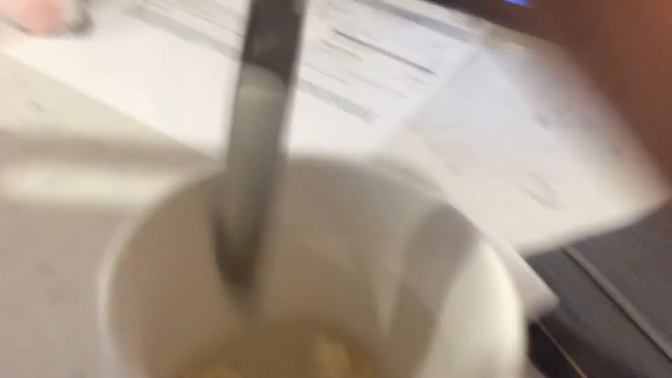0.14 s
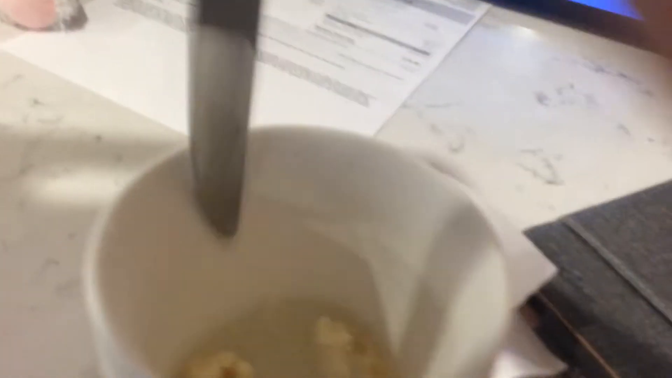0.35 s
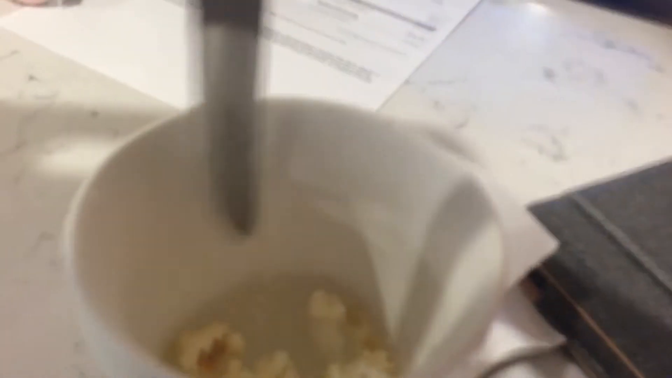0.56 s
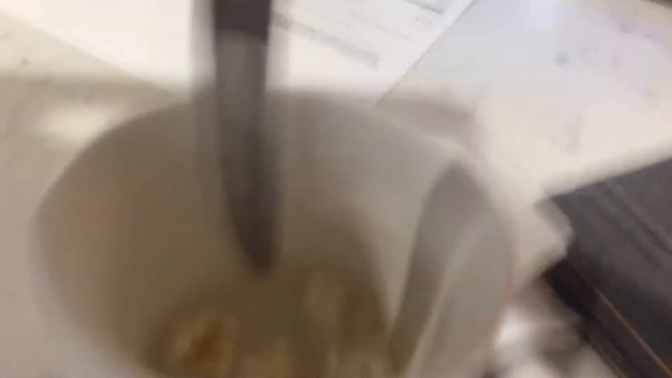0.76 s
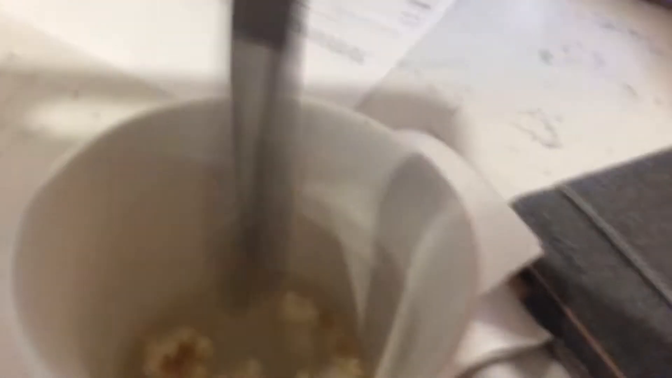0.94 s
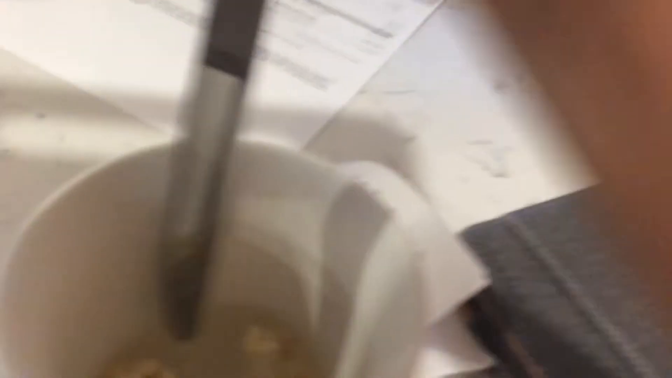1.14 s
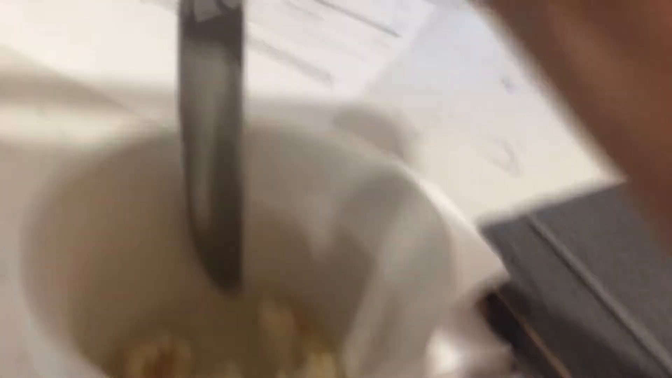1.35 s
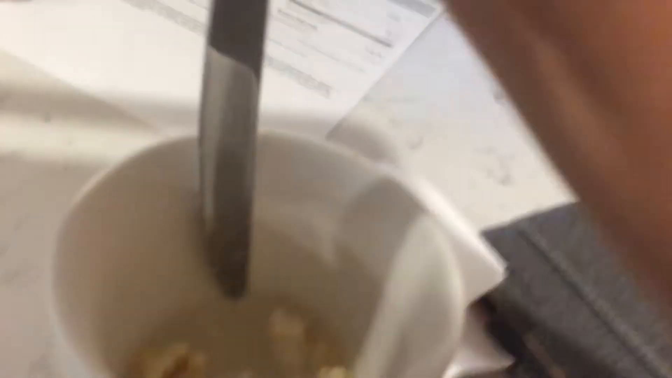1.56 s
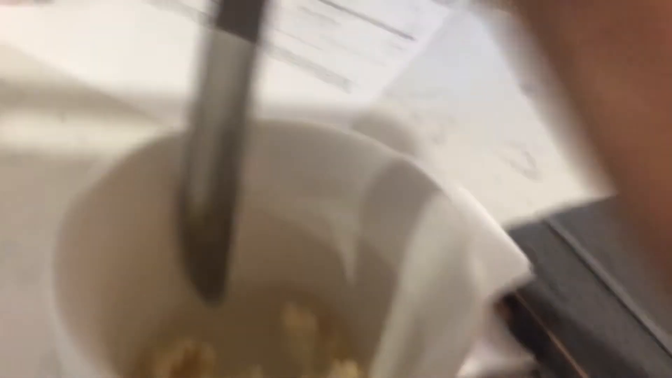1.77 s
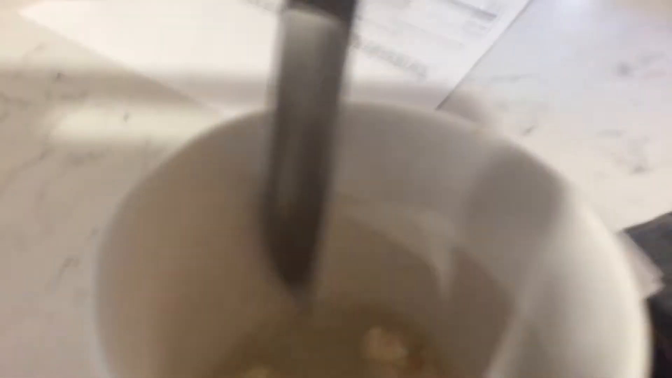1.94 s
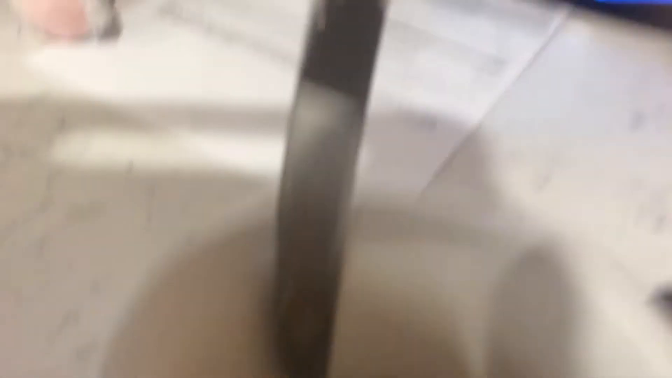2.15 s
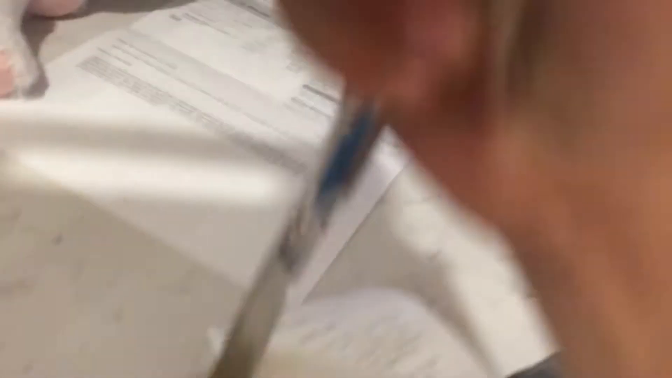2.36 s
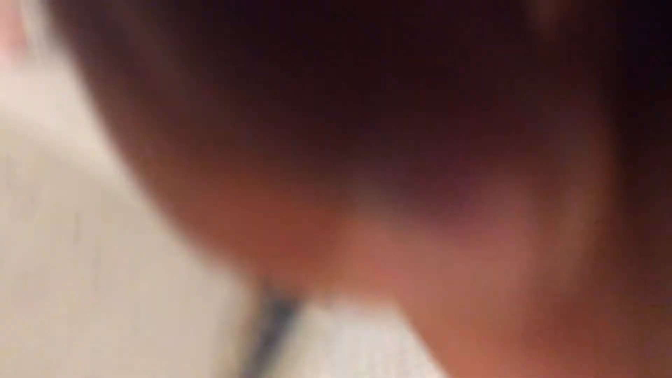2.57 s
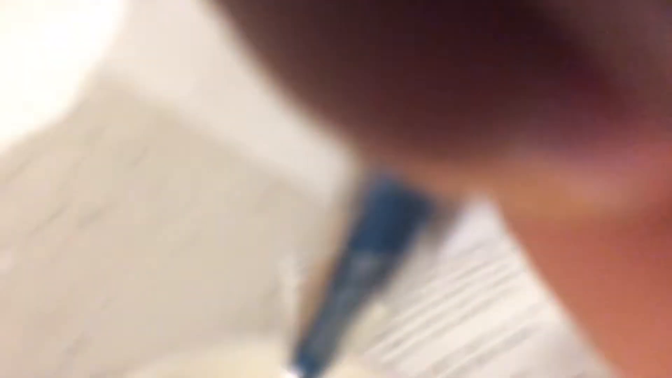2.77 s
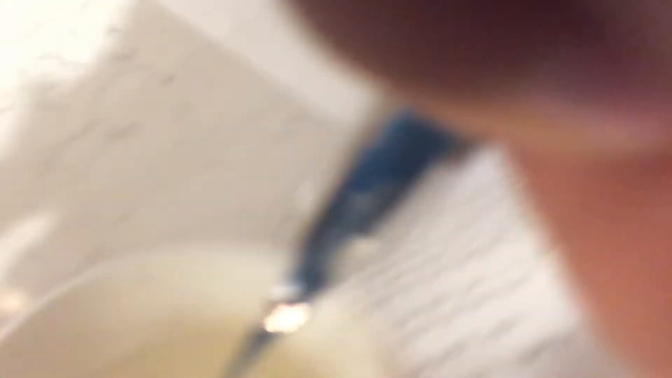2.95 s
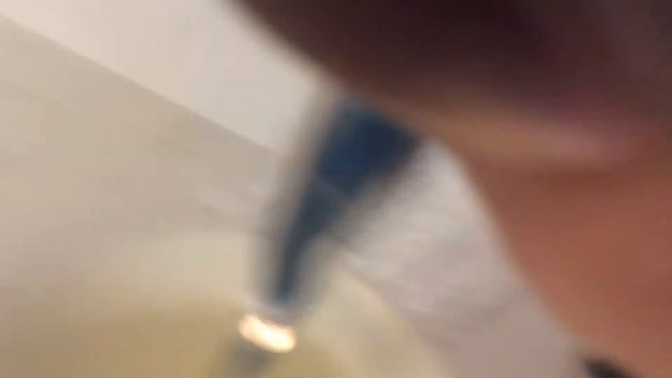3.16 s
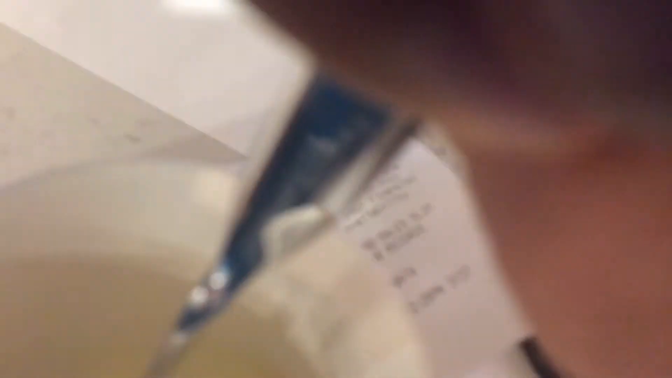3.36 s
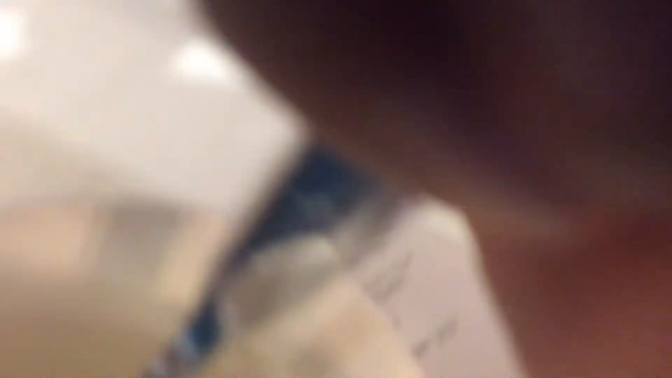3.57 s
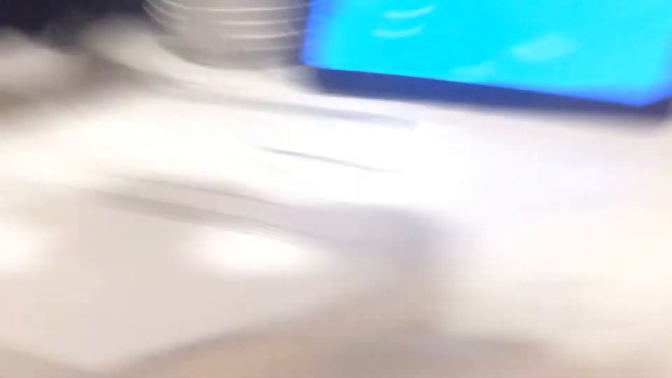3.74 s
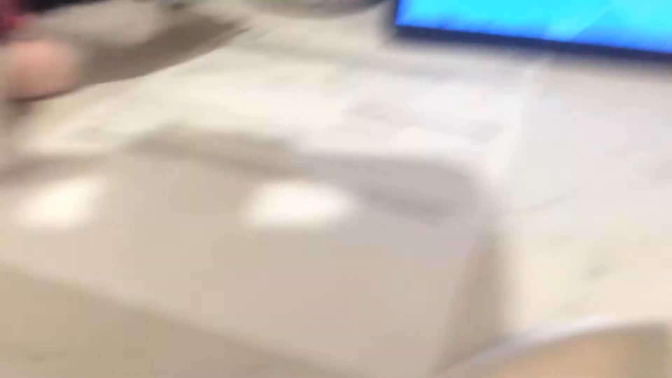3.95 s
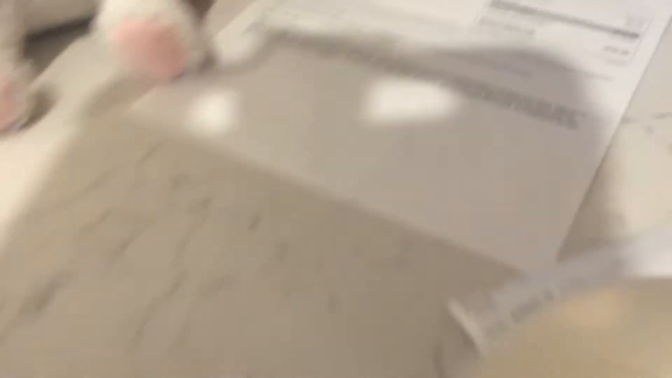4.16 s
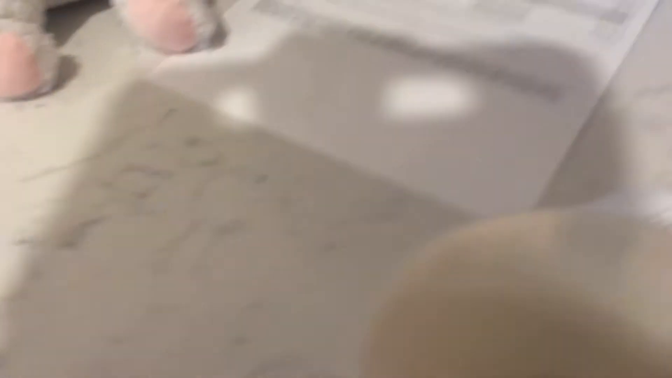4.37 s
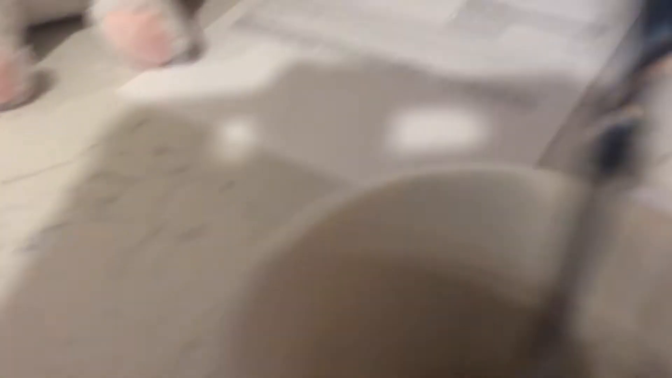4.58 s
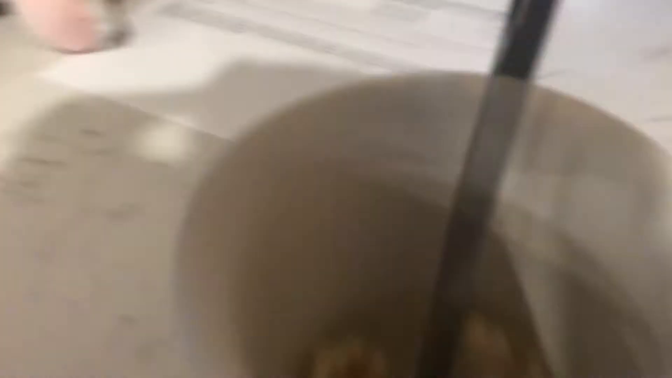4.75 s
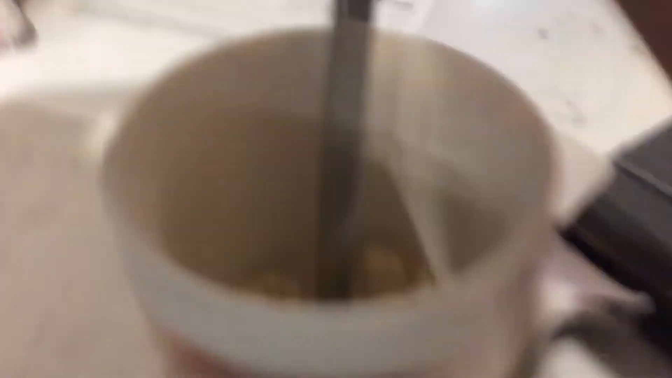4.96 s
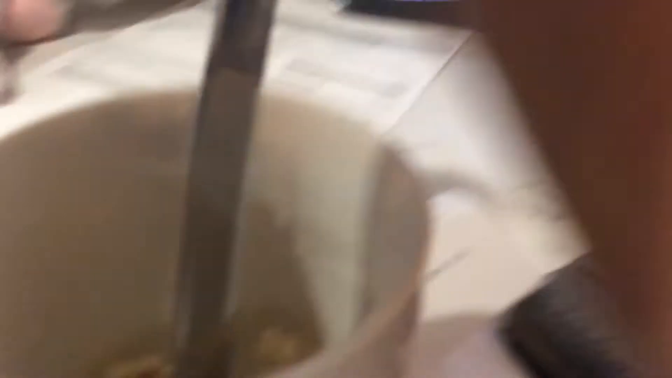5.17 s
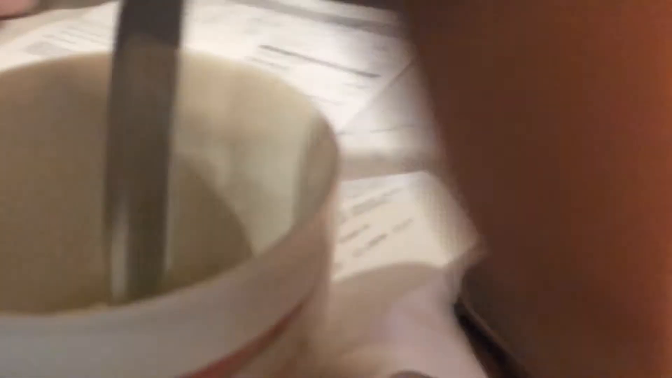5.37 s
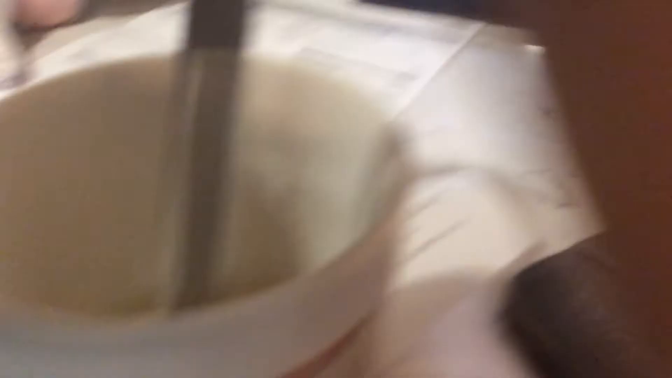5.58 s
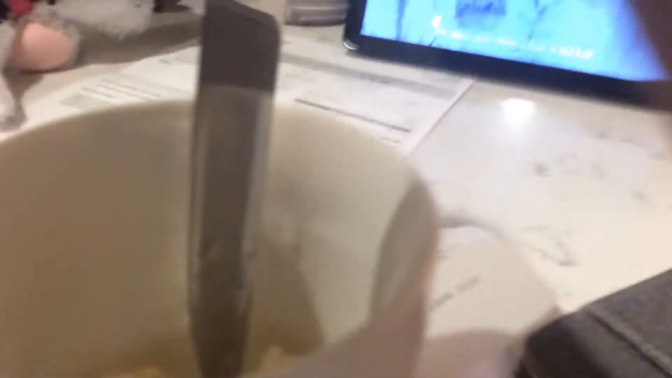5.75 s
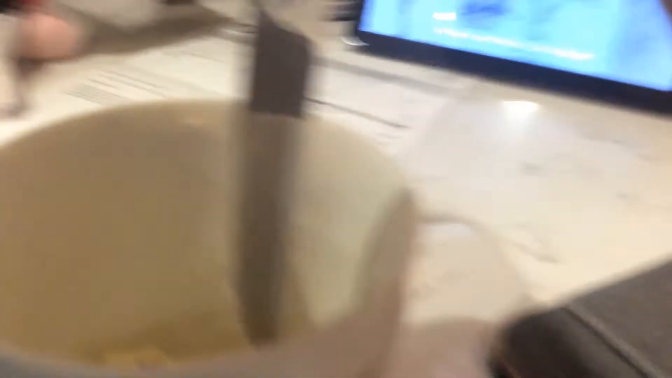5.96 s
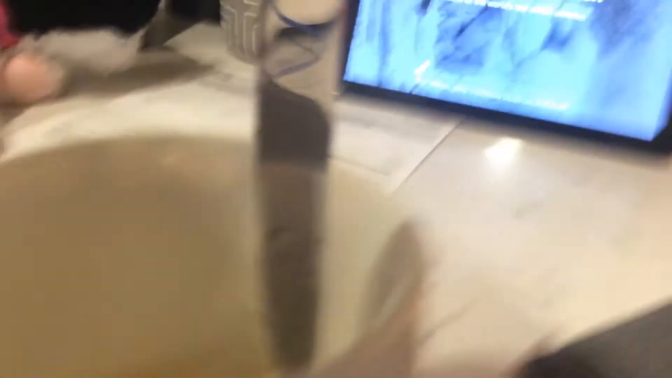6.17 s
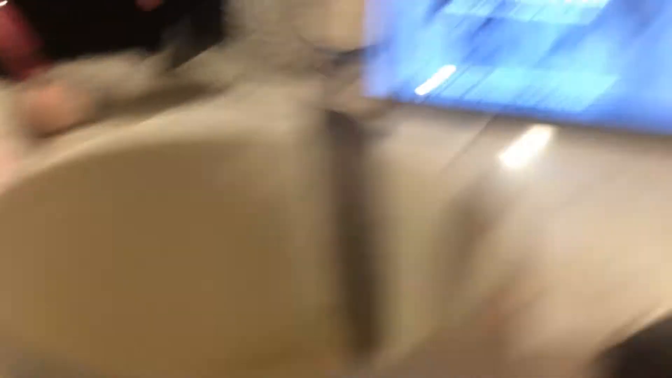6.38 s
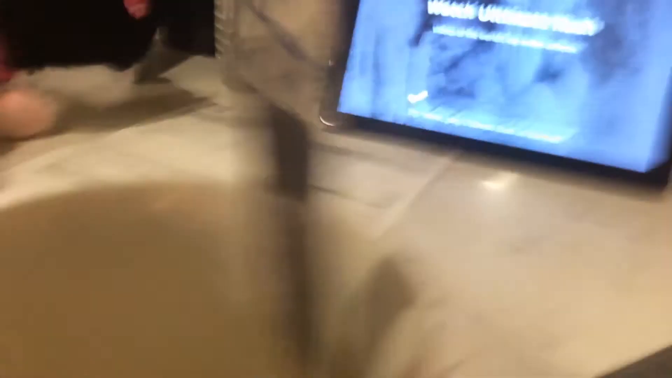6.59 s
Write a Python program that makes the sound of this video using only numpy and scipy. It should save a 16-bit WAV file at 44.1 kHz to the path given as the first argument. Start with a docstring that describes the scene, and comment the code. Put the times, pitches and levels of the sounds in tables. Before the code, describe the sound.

Close, dry crunching and scraping as a metal blade pokes crunchy bits in a mug, pausing midway, then hollower knocks and bright clinks.

```python
"""A quiet room, a mug on a counter, a phone microphone close by: a table knife stabs and stirs crisp pieces.
Each blow is a gritty noise crack that drives resonances of the mug's air and wall; stabs also thump the counter.
Clinks are decaying sines of glaze and steel; the dragging blade is grainy coloured noise with crumb ticks.
Behind them lie decaying-noise room tails, hiss and a faint steady tone; fingers shifting on the phone bump low."""
import sys
import numpy as np
from scipy import signal
from scipy.fft import rfft, irfft, next_fast_len
from scipy.io import wavfile
from scipy.ndimage import map_coordinates

SR = 44100
rng = np.random.default_rng(int(sys.argv[2]) if len(sys.argv) > 2 else 0)


def persist_wave(psi):
    """Save psi, clipped to +-1, as 16-bit WAV."""
    counts = np.round(np.clip(psi, -1, 1) * 32767).astype(np.int16)
    wavfile.write(sys.argv[1], SR, np.atleast_2d(counts).T)


N = 291942

# Columns carry their units; levels are nominal, before random spread and the mix.
# hiss of room and microphone: pitch_hz [Hz], density_db [dB per Hz, relative]
HISS_COLOUR = [(12, -66), (20, -48.5), (55, 9.5), (172, -10.5), (241, -35), (277, -6), (485, -15),
               (542, -21), (642, -22), (1090, -28.5), (1190, -24), (2820, -31.5), (8890, -22.5),
               (16000, -58.5)]
# decay of the room's answer: pitch_hz [Hz], t60_s [s]
ROOM_DECAY = [(100, 0.38), (500, 0.48), (1100, 0.34), (2500, 0.37), (8000, 0.37), (15000, 0.36)]
# fingers shifting on the phone: start_s [s], level_db [dB]
PHONE_BUMPS = [(2.647, -11), (2.931, -48), (3.211, -46), (3.719, -37), (3.83, -59)]
# blade dragging through pieces and along glaze: time_s [s], bright_rasp_db [dB], dull_rub_db [dB]
STIR_LEVELS = [(0.0, -52.5, -56), (0.8, -46.5, -57.5), (1.1, -59.5, -62), (1.5, -41, -37.5),
               (1.66, -53, -63), (1.9, -41, -49), (2.1, -65, -54.5), (2.449, -69, -71), (2.731, -53.5, -65),
               (3.2, -51, -62), (3.5, -64.5, -68), (3.75, -44.5, -52), (3.9, -59.5, -64), (4.47, -68, -72),
               (4.7, -43, -52.5), (5.0, -44, -39), (5.62, -48, -45.5), (5.85, -68.5, -57), (6.62, -58, -73)]
# single short drags of the blade: loudest_s [s], length_s [s], bright_rasp_db [dB], dull_rub_db [dB]
SINGLE_DRAGS = [(0.011, 0.022, -38.5, -43), (0.137, 0.021, -42, -41), (0.186, 0.032, -41, -54),
                (0.245, 0.03, -49, -63), (0.415, 0.024, -40, -55), (1.328, 0.026, -27, -43),
                (1.765, 0.014, -32, -39.5), (2.192, .068, -51, -80), (2.405, 0.039, -51.5, -69),
                (2.672, 0.06, -25, -33), (2.877, 0.035, -50.5, -71), (2.961, 0.055, -41, -72),
                (3.311, 0.17, -42, -49), (3.599, 0.057, -32, -48.5), (3.687, 0.067, -42.5, -50),
                (3.752, 0.11, -28.5, -63), (3.806, 0.15, -59, -41.5), (3.828, 0.048, -23, -48),
                (5.787, 0.065, -36.5, -41.5), (5.979, 0.079, -44, -55), (6.105, 0.041, -35, -47)]
# bright rasp: pitch_hz [Hz], density_db [dB per Hz, relative]
RASP_COLOUR = [(1500, -29.5), (2600, -10), (3700, -12), (5500, -7.5), (7400, -2.5), (9000, 3),
               (11000, -20.5), (15000, -35.5), (16500, -46)]
# dull rub: pitch_hz [Hz], density_db [dB per Hz, relative]
RUB_COLOUR = [(150, 5.5), (400, 2.5), (1000, 1.5), (1400, -1), (2200, -5.5), (2700, -13.5), (3500, -6),
              (5000, -23), (8000, -49.5)]
# clinks leaving glaze and blade ringing: start_s [s], mug_db [dB], free_blade_db [dB], held_blade_db [dB]
CLINK_EVENTS = [(.403, -47, -56, -57), (.844, -40, -43, -63), (0.876, -55, -64, -39.5),
                (1.031, -44, -62, -68), (1.067, -47, -54, -34), (1.141, -53, -66, -40),
                (1.3, -41.5, -50.5, -32), (1.349, -45, -63.5, -27.5), (1.538, -51, -42, -28.5),
                (1.783, -40, -49, -31.5), (1.955, -50, -51.5, -38), (2.663, -29, -55, -23),
                (2.678, -27, -43, -37.5), (3.267, -36, -63, -58), (3.302, -36, -44, -49),
                (3.412, -36, -65, -65), (3.52, -41.5, -61, -70), (3.584, -33, -68, -60),
                (4.482, -38, -55, -53), (5.526, -68, -55, -46), (5.561, -37, -63, -57),
                (5.993, -32, -65, -59), (6.227, -18, -53, -54), (6.446, -31.5, -51.5, -83)]
# ring of the mug before damping: pitch_hz [Hz], level_db [dB], t60_s [s]
MUG_MODES = [(1852, -19, .15), (2783, -12, .06), (3666, -3, .067), (5254, -12, .11), (7068, -7, .054),
             (8650, -8, .04), (10400, -10, .14), (10520, -3, .03), (12850, -20, .05), (13100, -26, .08)]
# blade ringing free: pitch_hz [Hz], level_db [dB], t60_s [s]
FREE_BLADE_MODES = [(745, -16, .15), (1631, -10, .18), (4689, -6, .22), (7617, 0, .3)]
# blade held in the heap: pitch_hz [Hz], level_db [dB], t60_s [s]
HELD_BLADE_MODES = [(1408, -1, 0.026), (2260, 7, 0.038), (3220, 0, 0.047)]
# how loosely the mug stands: time_s [s], ring_share [share of free t60], extra_knock_db [dB]
MUG_LOOSENESS = [(0, 0.57, 1), (3.42, .7, 4), (3.55, 0.37, -2), (5.7, 0.56, -2), (6.05, 1, 3.5),
                 (6.62, 0.97, 3)]
# counter boom: pitch_hz [Hz], level_db [dB], t60_s [s]
COUNTER_MODES = [(111, 8, 0.24), (150, 1, 0.16), (62, -23, 0.035)]
# hollow knock of the counter: pitch_hz [Hz], width_hz [Hz], level_db [dB]
KNOCK_PEAKS = [(318.4, 29.8, 1.5), (416, 89, -0.5), (545.3, 99, -0.5), (184, 46, -5), (746, 174, -6)]
# counter modes answering the air tone: pitch_hz [Hz], width_hz [Hz], level_db [dB]
COUNTER_ANSWER = [(914.5, 9.9, 4), (1078, 37, 0), (1260, 29, -9.5), (740, 4.7, -26)]
# how strongly counter and room carry the air tone on: time_s [s], level_db [dB]
CARRY_LEVELS = [(0, -17), (4.6, -13), (5.298, -8), (5.9, -15.5), (6.62, -25)]
# air column of the mug: pitch_hz [Hz], width_hz [Hz], level_db [dB]
AIR_PEAKS = [(1001, 74, 5), (1095.3, 77, 5), (1294, 226, -4.5), (750.5, 63, -7)]
# damped mug wall: pitch_hz [Hz], width_hz [Hz], level_db [dB]
WALL_PEAKS = [(1960, 520, -9), (3240, 156, 4.5), (3718, 210, 2.5), (5040, 1890, -6)]
# short bright ring of the rim: pitch_hz [Hz], width_hz [Hz], level_db [dB]
RIM_PEAKS = [(5100, 470, -5.5), (6920, 490, 3.5), (8080, 110, -2.5), (8545, 250, 6.5), (9630, 350, -4),
             (10350, 1200, -7.5), (11940, 410, -13.5)]
# colour of a crack: pitch_hz [Hz], density_db [dB per Hz, relative]
CRACK_COLOUR = [(880, -57.5), (1500, -30.5), (2260, -13.5), (2530, -34), (3660, -14.5), (4050, -25),
                (5360, -15.5), (8260, 4.5), (10400, -3.5), (11800, -14.5), (15700, -16), (16500, -27.5)]
# short cracks: pieces breaking, and second contacts just after stabs:
# start_s [s], crack_db [dB], wall_re_crack_db [dB], t60_s [s, clipped to .004-.15]
SHORT_CRACKS = [(0.0368, -32.5, -36, 0.05), (0.1555, -16.5, -20, .034), (0.188, -10, -18, 0.063),
                (0.2777, 1.5, -16.5, 0.045), (0.402, -13.5, -45, 0.093), (0.456, -21.5, -45, 0.036),
                (0.7114, -2.5, -24.5, 0.073), (0.7298, -14.5, -16.5, 0.12), (0.842, -23, -52, 0.1),
                (0.8732, -15, -8, 0.013), (0.9447, 1.5, -14.5, 0.016), (1.0295, -25.5, -15, 0.086),
                (1.07, -25, -7, 0.024), (1.1383, -22, -9, 0.027), (1.1966, -6.5, -10, 0.017),
                (1.2994, -10, -24, 0.029), (1.3485, -3, -23.5, 0.035), (1.3802, -14.5, -26.5, 0.09),
                (1.4778, -17, -23, 0.048), (1.504, -12, -21.5, 0.098), (1.5377, 0.5, -31.5, 0.069),
                (1.5628, -20, -7, 0.025), (1.7142, -17, -14.5, .04), (1.7525, -15.5, -14, 0.07),
                (1.7819, -2, -29, .044), (1.802, -9.5, -22, 0.08), (1.923, -23.5, -18, 0.044),
                (1.9552, -7, -24, 0.019), (1.9812, -19, -34.5, 0.045), (2.0074, -10, -26.5, 0.059),
                (2.038, -22.5, -33.5, 0.048), (2.293, -31, -18, .079), (2.3257, -28.5, -30, 0.12),
                (2.5378, -34, -46, 0.095), (2.581, -35.5, -48, 0.14), (2.618, -28.5, -31, 0.14),
                (2.6441, -4, -12, 0.0067), (2.6555, -0.5, -20, 0.022), (2.663, -7, -14, .03),
                (3.2712, -34, 5, 0.053), (3.2916, -9.5, -23.5, 0.0076), (3.298, 0, -8.5, 0.0047),
                (3.406, -35, -5, .008), (3.4103, -26, -19, 0.04), (3.487, -46, -22, 0.0066),
                (3.5823, -16, -1.5, 0.0098), (3.602, -12.5, -8, 0.0069), (3.645, -26.5, -13, 0.035),
                (3.7065, -12.5, -7, 0.0054), (4.09, -32, -36.5, 0.025), (4.514, -21, -14, 0.11),
                (4.5403, 3.5, -22, 0.042), (4.6825, -18.5, -23, .03), (4.71, -22, -21, 0.03),
                (4.7471, -19.5, 1, 0.022), (4.8578, -20, -36, .033), (4.887, -23.5, -32, 0.023),
                (4.973, -11.5, 1.5, .044), (5.1913, -6.5, -4, 0.046), (5.4104, -15.5, -8, 0.052),
                (5.527, -25, -22, .025), (5.59, -31, 4, 0.017), (5.6403, -7.5, -3.5, 0.044),
                (5.7744, -22, -13.5, 0.031), (5.7862, -17, -29, 0.033), (5.806, -12.5, -18, .023),
                (5.9617, -27, -19, 0.039), (5.9746, -18.5, -22, .03), (5.9886, -21, -31, 0.066),
                (6.098, -12, -17, 0.048), (6.2248, -14.5, -40, 0.03), (6.3507, -8.5, -19, .037),
                (6.3792, -30.5, -31, 0.018), (6.4453, -22.5, -11, 0.022), (6.574, -9, -16, 0.039)]
# blade on the mug's bottom, rebounds too: start_s [s], crack_db [dB], air_tone_db [dB], counter_thump_db [dB]
STAB_EVENTS = [(0.0599, -1, -16, -24), (0.266, -5, -23.5, -27.5), (0.4949, 2, -24.5, -23),
               (0.7055, -2.5, -21.5, -27.5), (0.939, -7, -22, -28.5), (0.971, -29, -28, -50),
               (1.1887, 2, -18, -25), (1.227, -37, -32, -40), (1.3953, 0, -25, -26),
               (1.4271, -22, -24, -44), (1.4964, -19.5, -21, -39), (1.6332, -2.5, -22.5, -27.5),
               (1.6667, -19, -29.5, -43), (1.85, -0.5, -19.5, -33.5), (2.0591, 2.5, -15, -29),
               (2.2678, -21, -40.5, -42.5), (2.7863, -47, -48.5, -67), (3.21, -24, -43.5, -54),
               (4.4822, 0, -30.5, -36), (4.7356, -1, -12.5, -25), (4.9653, -10, -9.5, -22),
               (5.1851, -23, -10.5, -24), (5.4032, -6.5, -8.5, -21.5), (5.433, -28, -30, -51),
               (5.5621, -12, -35, -38), (5.6314, -9.5, -12, -22), (6.0888, -15, -39, -41.5),
               (6.3436, -10.5, -36, -43), (6.5711, -15.5, -28, -33.5)]

HISS_DB, HUM_HZ, HUM_DB = -60, 545, -72.5
SWELL_SHARE = 0.47  # part of a drag spent growing
CLINK_TILT_DB = -1  # mug ring brightness, dB an octave
THUMP_LAG_S, KNOCK_RE_THUMP_DB = .005, -11
WALL_RE_CRACK_DB, WALL_RE_AIR_DB = -15.5, -7.5  # the crack and the blow sounding the air both shake the wall
STAB_T60_S, CRACK_AIR_RE_CRACK_DB = 0.039, -38
BOUNCE_S, BOUNCE_DB = .0075, -5.5  # the tip skips once and sounds the air again
EDGE_DB, EDGE_PER_WALL = -30.5, -0.62  # treble re crack; the more a contact shakes the wall, the duller it is
SNAP_DB = -3  # single click opening a crack, re its level
LEAD_IN_S = .004  # short, soft lead-in swelling into the crack
BASS_HZ, TOP_HZ = 67.5, 16000  # band limits


def amp(db):
    """Decibels to amplitude."""
    return 10 ** (np.asarray(db) / 20)


def unit(x):
    """Scale to rms 1."""
    return x / np.sqrt(np.mean(x ** 2) + 1e-20)


def along(points, hz):
    """Interpolate (Hz, value) points on a log frequency axis."""
    f, v = np.transpose(points)
    return np.interp(np.log(hz + 1), np.log(f + 1), v)


def filtered(x, response):
    """Multiply the spectrum of x by a complex response of frequency."""
    m = next_fast_len(len(x) + SR // 2)
    return irfft(rfft(x, m) * response(np.fft.rfftfreq(m, 1 / SR)), m)[:len(x)]


def band(x, lo_hz, hi_hz):
    """Keep what lies between two smooth band edges."""
    return filtered(x, lambda hz: 1 / (1 + (lo_hz / (hz + 1)) ** 12) / (1 + (hz / hi_hz) ** 12))


def noise(spectrum):
    """Coloured noise of rms 1."""
    return unit(filtered(rng.standard_normal(N), lambda hz: amp(along(spectrum, hz))))


def resonant(x, peaks):
    """Drive causal resonances of alternating sign, scaled so that a single blow peaks at its own size."""
    def response(hz):
        total = 0
        for k, (centre, width, db) in enumerate(peaks):
            damping = 1j * hz * width
            total = total + (-1) ** k * amp(db) * damping / (centre * centre - hz * hz + damping)
        return total
    blow = filtered(signal.unit_impulse(4096), response)
    return filtered(x, response) / np.abs(blow).max()


def ring(modes, spread_db, attack, tilt_db=0, last=1):
    """One blow on decaying modes of random strength; tilt_db is per octave, last scales the decays."""
    t = np.arange(SR // 3) / SR
    tone = 0
    for hz, db, t60 in modes:
        level_db = db + tilt_db * np.log2(hz / 4000) + spread_db * rng.standard_normal()
        tone = tone + amp(level_db - 60 * t / max(t60 * last, .005)) * np.sin(2 * np.pi * hz * t)
    return tone * (1 - np.exp(-t / attack))


def add(track, s, sound):
    """Lay a sound on a track from s seconds."""
    track[round(s * SR):][:len(sound)] += sound


def grit(rate, depth_db):
    """Jagged gain of a contact breaking up into grains, rate points a second, rms 1."""
    points = rng.standard_normal(int(N * rate / SR) + 4)
    return unit(amp(depth_db * map_coordinates(points, [np.arange(N) * rate / SR])))


def background():
    """Coloured hiss and a faint steady sine."""
    hum = np.sin(2 * np.pi * HUM_HZ * np.arange(N) / SR)
    return amp(HISS_DB) * noise(HISS_COLOUR) + amp(HUM_DB) * hum


def room(x):
    """Noise tails in which each frequency dies at its own speed; a new tail every third of a second."""
    out, step = np.zeros(N + 2 * SR), SR // 3
    for start in range(0, N, step):
        hz, t, z = signal.stft(rng.standard_normal(SR // 2), SR, nperseg=256)
        decay = amp(-60 * t / along(ROOM_DECAY, hz)[:, None])
        tail = signal.istft(z * decay, SR, nperseg=256)[1]
        answer = signal.fftconvolve(x[start:start + step], tail / np.linalg.norm(tail))
        add(out, start / SR + 0.0063, answer)
    return out[:N]


def handling():
    """A dull push straight into the phone's casing: short, low, damped modes."""
    out = np.zeros(N + SR)
    casing = [(55, -15, 0.11), (123.4, 1, 0.041), (227, -17.0, 0.029)]  # Hz, dB, t60 s
    for s, db in PHONE_BUMPS:
        add(out, s, amp(db) * ring(casing, spread_db=1.5, attack=0.00023))
    return out[:N]


def stirring():
    """Dense small grains of friction with single short drags on top; loose crumbs tick on the mug."""
    s, rasp_db, rub_db = np.transpose(STIR_LEVELS)
    t = np.arange(N) / SR
    clumps = grit(rate=30, depth_db=4)  # the heap gives way in fits
    rasp = amp(np.interp(t, s, rasp_db)) * clumps
    rub = amp(np.interp(t, s, rub_db)) * clumps
    for loudest, length, bright_db, dull_db in SINGLE_DRAGS:
        swell, fade = SWELL_SHARE * length, (1 - SWELL_SHARE) * length
        knots = loudest + np.array([-swell - .006, -swell, 0, fade, fade + 0.0034])
        stroke = amp(np.interp(t, knots, [-56, -7.5, 2.0, -15.5, -44.0], -200, -200))
        rasp = rasp + amp(bright_db) * stroke
        rub = rub + amp(dull_db) * stroke

    hits_now = rng.random(N) < 150 / SR  # about 150 crumb ticks a second
    ticks = hits_now * amp(1.7 * rng.standard_normal(N)) * rng.choice([-1, 1], N)
    hiss = noise(RASP_COLOUR) + amp(-15) * unit(resonant(rng.standard_normal(N), RIM_PEAKS))
    body = noise(RUB_COLOUR) + amp(-18.5) * unit(resonant(rng.standard_normal(N), WALL_PEAKS))
    crumbs = amp(0.5) * resonant(rasp * ticks, RIM_PEAKS) + amp(-3.5) * resonant(rub * ticks, WALL_PEAKS)
    glaze = [(hz, 4.4 / t60, db) for hz, db, t60 in MUG_MODES]
    pings = ticks * (rng.random(N) < .3) * (rasp + rub)  # some crumbs hit bare glaze
    crumbs = crumbs + amp(-3) * resonant(pings, glaze)
    grainy_rasp = rasp * grit(rate=750, depth_db=2.0) * unit(hiss)
    grainy_rub = rub * grit(rate=470, depth_db=2.5) * unit(body)
    return grainy_rasp + grainy_rub + crumbs


def loose(s):
    """Ring share and extra knock (dB) of the loosely standing mug at a moment."""
    at, share, knock_db = np.transpose(MUG_LOOSENESS)
    return np.interp(s, at, share), np.interp(s, at, knock_db)


def clinks():
    """Hard steel on glaze: thin decaying modes of mug, free blade and held blade."""
    out, spread_db = np.zeros(N + SR), 2.5
    for s, mug_db, free_db, held_db in CLINK_EVENTS:
        mug = ring(MUG_MODES, spread_db, attack=.0004, tilt_db=CLINK_TILT_DB, last=loose(s)[0])
        add(out, s, amp(mug_db) * mug)
        add(out, s, amp(free_db) * ring(FREE_BLADE_MODES, spread_db, attack=.0004))
        add(out, s, amp(held_db) * ring(HELD_BLADE_MODES, spread_db, attack=0.0011))
    return out[:N]


def counter_thumps():
    """Under each stab the counter booms at its lowest modes and knocks briefly above them."""
    boom, blows = np.zeros((2, N + SR))
    t = np.arange(SR // 10) / SR
    for s, _, _, db in STAB_EVENTS:
        add(boom, s + THUMP_LAG_S, amp(db) * ring(COUNTER_MODES, spread_db=2, attack=0.005))
        knock_db = db + KNOCK_RE_THUMP_DB + loose(s)[1]
        add(blows, s + THUMP_LAG_S, amp(knock_db - 60 * t / 0.063) * rng.standard_normal(len(t)))
    return boom[:N], resonant(blows[:N], KNOCK_PEAKS)


def contacts():
    """Stabs and short cracks as rows start_s, crack_db, air_tone_db, wall_db, t60_s."""
    rows = []
    for s, db, air_db, _ in STAB_EVENTS:
        shaken = np.hypot(amp(db + WALL_RE_CRACK_DB), amp(air_db + WALL_RE_AIR_DB))
        rows.append((s, db, air_db, 20 * np.log10(shaken), STAB_T60_S))
    for s, db, wall_db, t60 in SHORT_CRACKS:
        rows.append((s, db, db + CRACK_AIR_RE_CRACK_DB, db + wall_db, t60))
    return rows


def crack_shape(t, t60):
    """A short, soft lead-in swelling into the crack, then a snap, then crumbling."""
    late = np.maximum(t - LEAD_IN_S, 0)
    crumble, snap = amp(-60 * late / np.clip(t60, .004, .15)), amp(-60 * late / 0.006)
    shape = (1 - np.exp(-late / 0.00054)) ** 2 * (crumble + 0.8 * snap)
    lead_in = (t < LEAD_IN_S + .001) * t / LEAD_IN_S
    return shape / shape.max() + amp(-21.0) * lead_in


def hits():
    """Each contact is a gritty crack; it also pushes the air, the wall and the rim of the mug."""
    crack, push, tone, wall, chink, snaps = np.zeros((6, N + SR))
    column = [(hz, db, 2.2 / width) for hz, width, db in AIR_PEAKS]  # width to t60
    t = np.arange(SR // 8) / SR
    grain, colour = grit(rate=900, depth_db=4.5), noise(CRACK_COLOUR)
    body = grain * unit(band(colour, 1, 11000))
    edge = grain * unit(band(colour, 11000, SR))
    for s, db, air_db, wall_db, t60 in contacts():
        edge_db = EDGE_DB + EDGE_PER_WALL * (wall_db - db)
        snaps[round((s + .001) * SR)] = amp(db + SNAP_DB) * rng.choice([-1, 1])
        shape, onset = crack_shape(t, t60), s - LEAD_IN_S
        span = (round(s * SR) + np.arange(len(t))) % N
        # the grains share out the energy of the blow
        size = np.linalg.norm(shape) / np.linalg.norm(shape * body[span])
        add(crack, onset, amp(db - 12.0) * size * shape * (body[span] + amp(edge_db) * edge[span]))
        add(wall, onset, amp(wall_db - 16) * shape * rng.standard_normal(len(t)))
        add(tone, s, amp(air_db) * ring(column, spread_db=3.0, attack=0.00089))
        add(tone, s + BOUNCE_S, amp(air_db + BOUNCE_DB) * ring(column, spread_db=5.5, attack=0.00074))
        # crumbling keeps the air going
        add(push, onset, amp(air_db - 17) * shape * rng.standard_normal(len(t)))
        # the contents damp the mug's ring
        damped = ring(MUG_MODES[1:], spread_db=7.5, attack=0.00025, last=0.3, tilt_db=-3.0)
        add(chink, s, amp(wall_db - 5.0) * damped)
    click = np.fft.fftshift(irfft(amp(along(CRACK_COLOUR, np.fft.rfftfreq(128, 1 / SR)))))
    crack = (crack + np.convolve(snaps, click / click.max(), 'same'))[:N]
    bright = crack + chink[:N] + amp(-18) * resonant(crack, RIM_PEAKS)
    return bright, push[:N], tone[:N], resonant(wall[:N], WALL_PEAKS)


def scene():
    """Close sounds, the share that reaches the room's walls, the stirring and the background."""
    crack, push, tone, wall = hits()
    boom, knock = counter_thumps()
    carry = amp(np.interp(np.arange(N) / SR, *np.transpose(CARRY_LEVELS)))
    air = tone + resonant(push, AIR_PEAKS)
    answer = amp(-35) * resonant(carry * tone, COUNTER_ANSWER)
    near = crack + air + answer + wall + boom + knock + clinks() + handling()
    far = amp(-26.0) * crack + carry * (air + amp(8) * knock) + amp(-20.5) * wall
    return (near + room(far) + stirring() + background())[None]


def record(dry):
    """The bass fades below BASS_HZ, the loudest cracks clip softly and the sound has nothing above TOP_HZ."""
    heard = filtered(dry[0], lambda hz: 1j * hz / (1j * hz + BASS_HZ))
    clipped = heard / (1 + np.abs(heard / .98) ** 6) ** (1 / 6)
    return filtered(clipped, lambda hz: 1 / (1 + (hz / TOP_HZ) ** 120))[None]


dry = scene()
out = record(dry)
persist_wave(out)
```